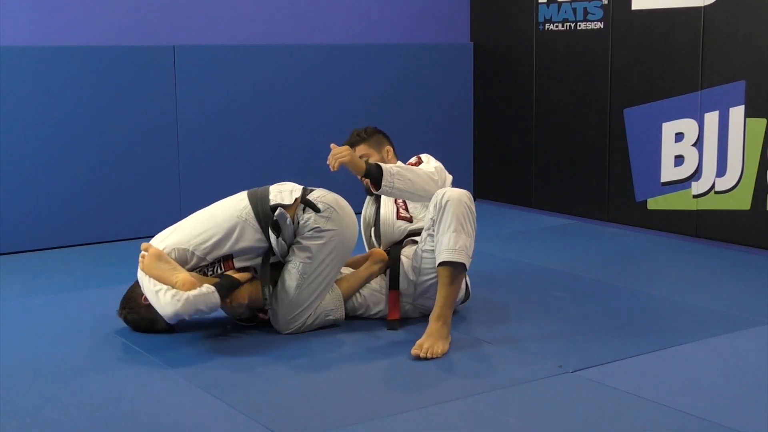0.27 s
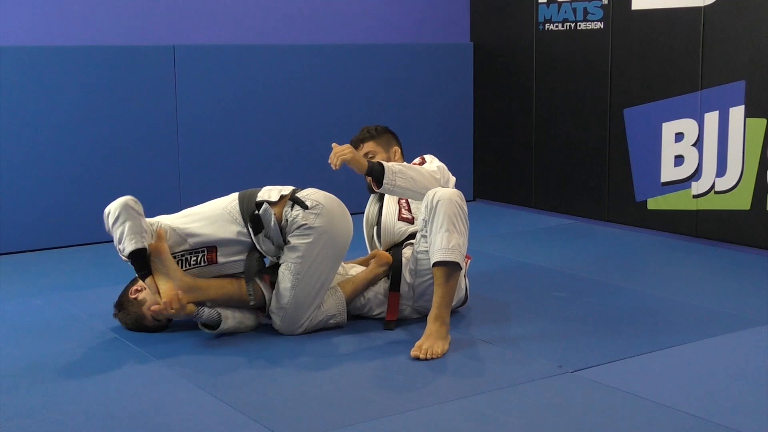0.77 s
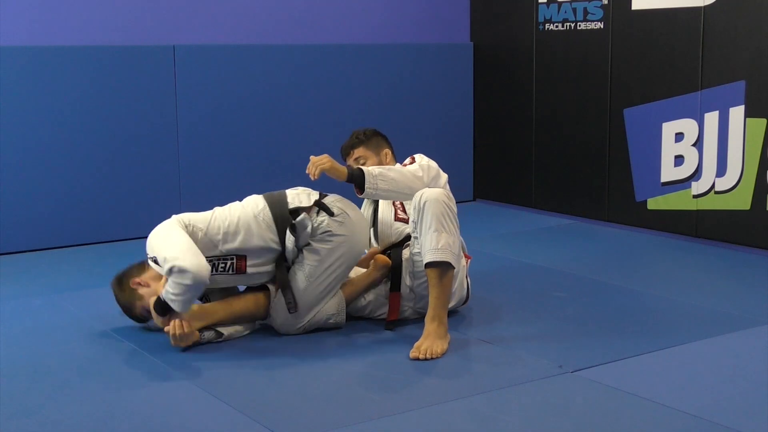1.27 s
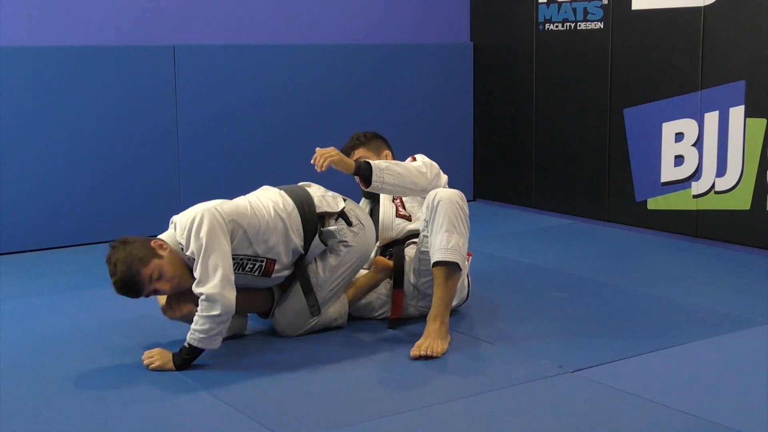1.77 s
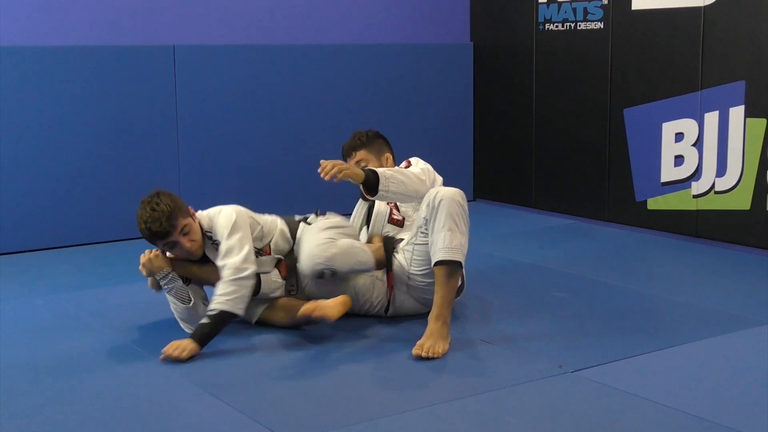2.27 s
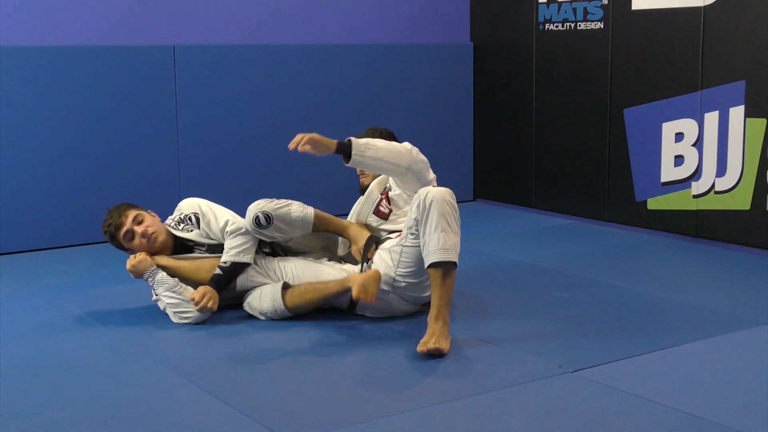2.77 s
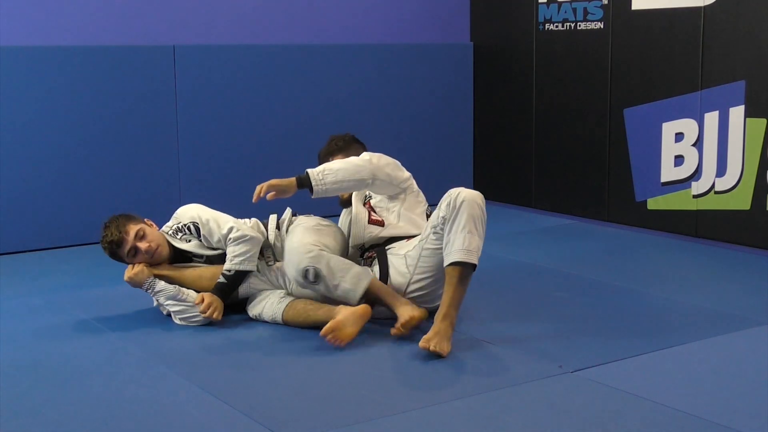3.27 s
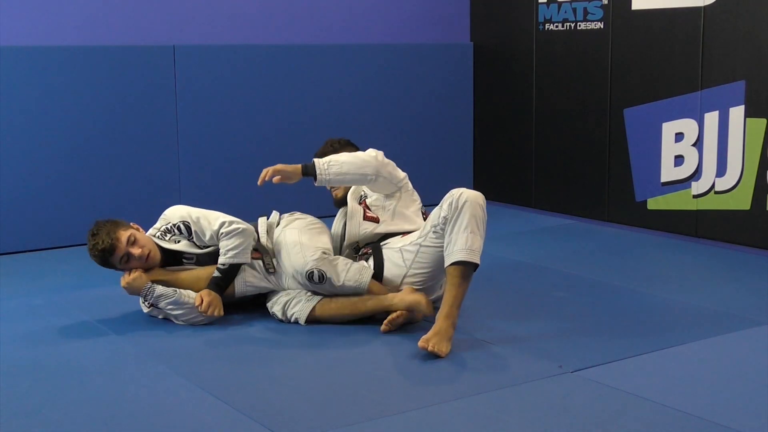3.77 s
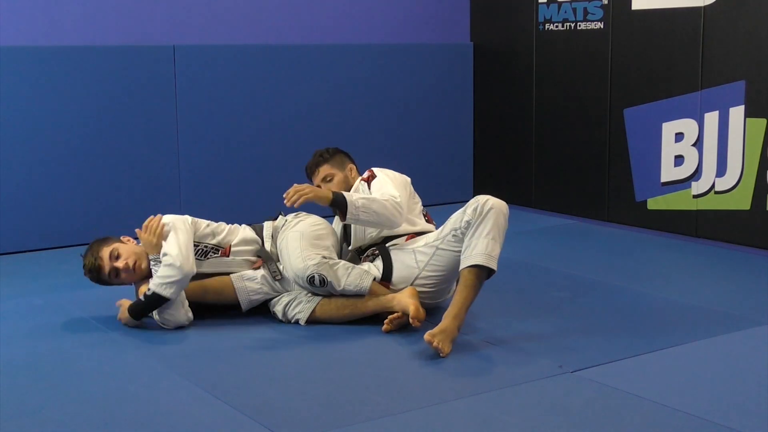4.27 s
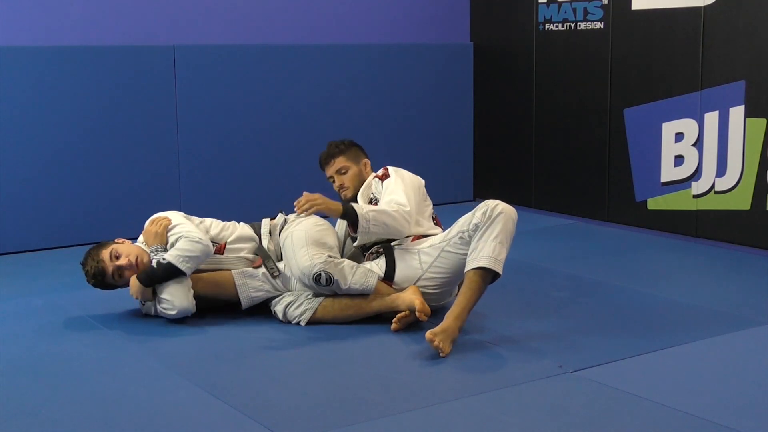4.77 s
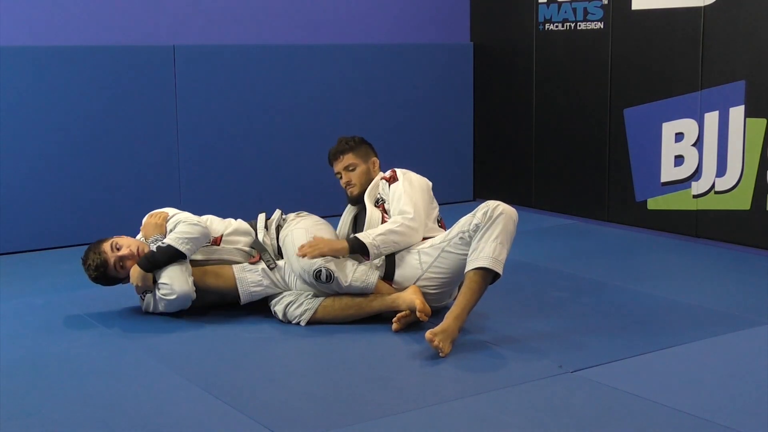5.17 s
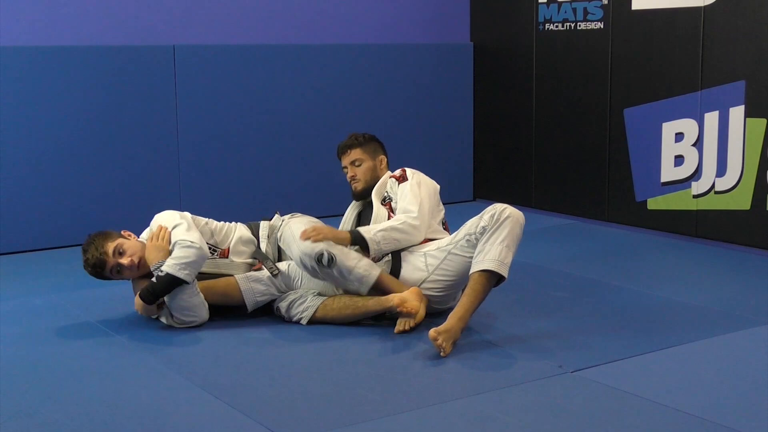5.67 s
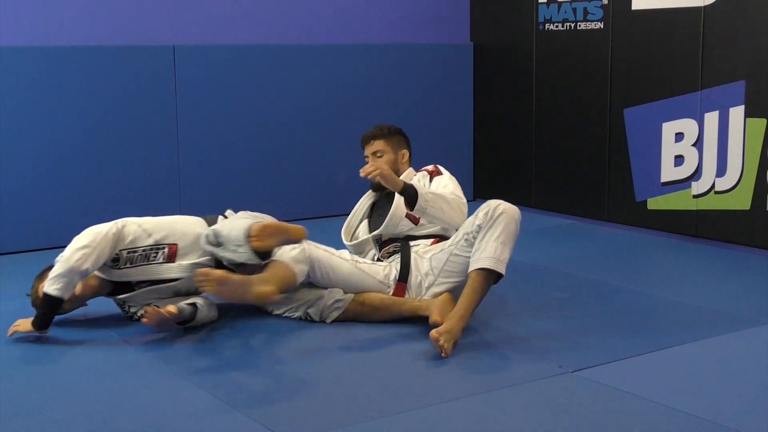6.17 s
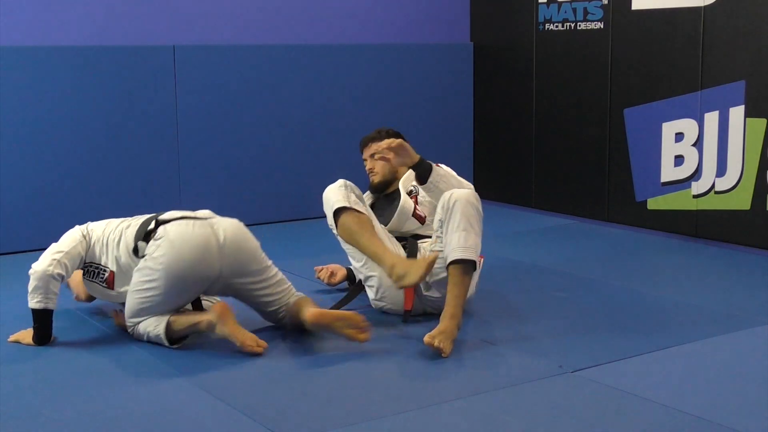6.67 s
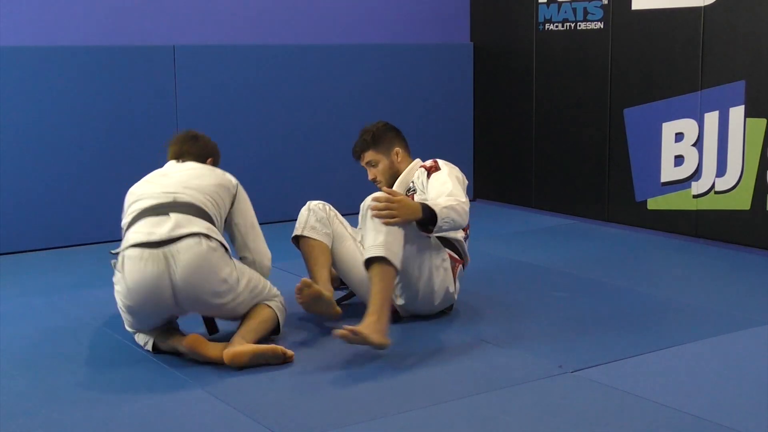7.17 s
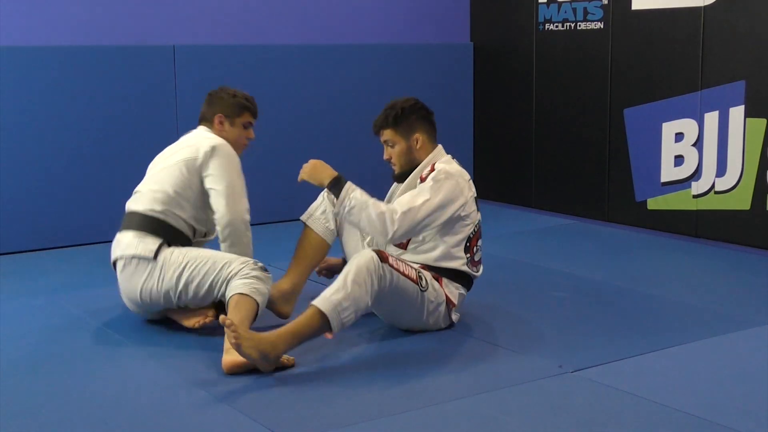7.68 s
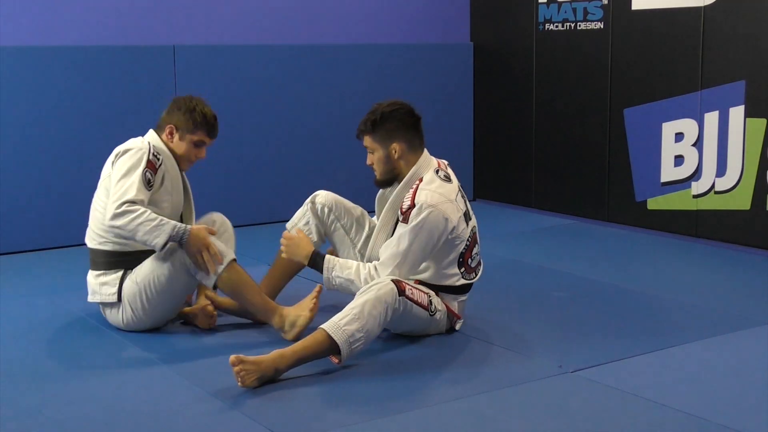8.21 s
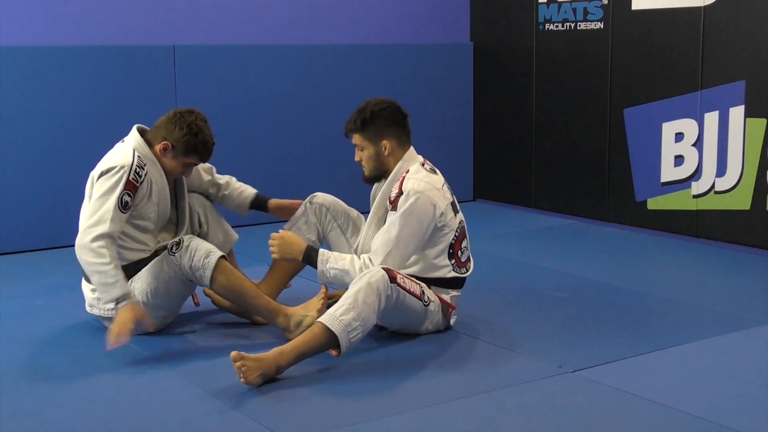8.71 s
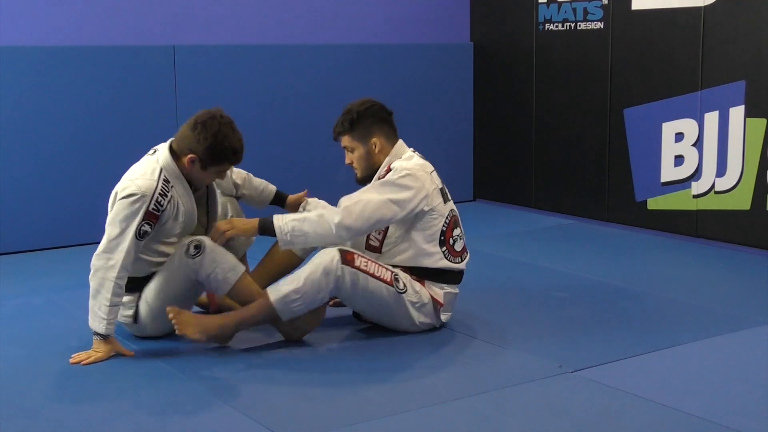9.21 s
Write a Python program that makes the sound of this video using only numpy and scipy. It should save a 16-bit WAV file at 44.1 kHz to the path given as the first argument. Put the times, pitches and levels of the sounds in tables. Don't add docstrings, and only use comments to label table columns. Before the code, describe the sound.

Thick cotton uniforms rustle and rasp as two people roll on foam mats, with dull floor thuds, a quick double slap and quiet resetting shuffles.

```python
import sys
import numpy as np
from scipy import signal
from scipy.fft import rfft, irfft
from scipy.io import wavfile
from scipy.ndimage import uniform_filter1d

SR = 44100
rng = np.random.default_rng(int(sys.argv[2]) if len(sys.argv) > 2 else 0)


def wrap_up_sound(samples):
    columns = np.atleast_2d(samples).T
    tamed = np.clip(columns, -1, 1)
    steps = np.round(tamed * 32767).astype(np.int16)
    wavfile.write(sys.argv[1], SR, steps)


def volts(x):
    e = np.asarray(x, float) / 20
    return 10 ** e


N = 416744


def on_log(hz, table):
    at_hz, value = np.transpose(table)
    return np.interp(np.log(np.maximum(hz, 1)), np.log(at_hz), value)


def colour(x, table):
    size = 8192
    gain = volts(on_log(np.fft.rfftfreq(size, 1 / SR), table))
    cepstrum = irfft(np.log(gain))
    cepstrum[1:size // 2] *= 2
    cepstrum[size // 2 + 1:] = 0
    impulse = irfft(np.exp(rfft(cepstrum)))[:min(size // 2, len(x))]
    return signal.oaconvolve(x, impulse)[:len(x)]


def unit(x):
    return x / np.sqrt(np.mean(x ** 2))


def walk(rate_hz):
    hold = max(int(SR / rate_hz), 1)
    steps = np.repeat(rng.standard_normal(N // hold + 1), hold)
    return 0.754 * uniform_filter1d(uniform_filter1d(steps, hold), hold)[:N]


def ring(t, hz, t60_s, push_s):
    return np.sin(2 * np.pi * hz * t) * 10 ** (-3 * t / t60_s) * (1 - np.exp(-t / push_s))


def add(track, start_s, sound):
    i = int(start_s * SR)
    track[i:i + len(sound)] += sound[:N - i]


def ventilation():
    # frequency [Hz], level [dB per Hz].
    air_spectrum = [(15, -33), (25, 0), (55, -7.5), (161, -1.5), (212, -0.5), (285, -7), (476, -10),
                    (591, -21), (796, -18.5), (1130, -7.5), (6050, -22), (10100, -22), (16000, -24.5)]
    # frequency [Hz], wander [Hz], level [dB rms].
    fan_tones = [(54.5, 4.5, -62), (121.7, 4.13, -64.5)]
    air = unit(colour(rng.standard_normal(N), air_spectrum)) * volts(-51 + .4 + .6 * walk(3))
    for hz, wander_hz, db in fan_tones:
        level = volts(db + 6.2 * walk(8.2))
        phase = 2 * np.pi * np.cumsum(hz + wander_hz * walk(5.9)) / SR
        air = air + level * unit(np.sin(phase))
    return air


def room(x):
    # frequency [Hz], T60 [s].
    room_decay = [(100, 0.57), (400, 0.49), (1500, 0.64), (5000, 0.5), (14000, 0.43)]
    t, tail = np.arange(SR) / SR, 0
    for hz in 61.0 * 2. ** np.arange(8):
        low_hz = hz / np.sqrt(2)
        high_hz = min(hz * np.sqrt(2) ** (1 + (hz > 7000)), .45 * SR)
        band = signal.butter(2, [low_hz, high_hz], "band", fs=SR, output="sos")
        decay = 10 ** (-3 * t / max(on_log(hz, room_decay), .05))
        tail = tail + signal.sosfilt(band, rng.standard_normal(SR)) * decay
    tail = tail * (1 - np.exp(-(t / 0.026) ** 4))
    return signal.fftconvolve(x, tail / np.sqrt(np.sum(tail ** 2)))[:N]


def thumps():
    # start [s], peak [dB], dent pitch [Hz], share of the slab modes [dB].
    landings = [(0.454, -34.5, 361, 5.5), (0.478, -35, 257, -2), (1.946, -39.5, 139, 7),
                (2.014, -32.5, 434, 0), (2.259, -17.5, 185, -1), (2.288, -12.5, 230, -5.5),
                (2.301, -20, 243.5, 2), (2.324, -21, 175, -5), (2.349, -22, 303, -1),
                (2.374, -23.5, 275, -6), (2.499, -36, 260, -3), (3.076, -32.5, 470, -16),
                (3.147, -27, 364.7, -4), (3.382, -35.5, 363, -1), (3.788, -32.5, 400, -10),
                (4.237, -39, 350, 3), (5.212, -29, 474, 0), (5.419, -32, 472, 2), (6.295, -34, 290, 0),
                (7.81, -32, 400, -2), (0.5, -34.5, 234, -3), (0.372, -42, 367, -6), (0.522, -40, 235, -9),
                (7.371, -42, 183, 1), (7.443, -41, 417, -4), (7.63, -39, 202, 0.5), (7.82, -37, 220, 0),
                (8.33, -40.5, 210.4, 2), (8.4, -44, 180, 0), (9.063, -42, 186, 3), (9.384, -40, 158.7, 2),
                (8.796, -44, 147, 0), (6.907, -40, 202, 0), (7.222, -36, 172, -6), (7.236, -24.5, 198, -8),
                (7.612, -38.5, 147.5, 0), (7.774, -31.5, 352, 4.5), (8.278, -40, 194, -1),
                (8.91, -42, 270.5, 1), (9.0, -41, 155, 0.5), (9.315, -40.5, 331, -2)]
    staged_contacts = [(1.6215, -29.5, 390, -6, 3.8), (1.64, -36, 510, -8, 4), (1.645, -30, 214, -15, 13),
                       (2.255, -21, 340, -4, 2.8), (2.27, -32.5, 55.88, -4, 4.6),
                       (6.5464, -12, 335, -7, 3.2), (6.573, -15, 210, -9, 7), (6.549, -18, 170, -8, 5.5),
                       (6.603, -22, 237, -6, 5.6), (2.232, -30, 350, -10, 3.2), (3.152, -33, 173, -8, 4.3),
                       (3.434, -39.5, 412, 2, 9.6), (3.47, -40, 388, -6, 6.6), (3.495, -35, 436, -6, 5.6),
                       (3.522, -44, 350, -7, 7), (3.556, -40, 190.4, -4, 4.4), (3.6, -42, 330, -2, 7),
                       (6.553, -32, 100, -5, 3.9), (8.681, -46, 115, -4, 8), (5.422, -36.5, 290, 2, 7.1),
                       (6.559, -24, 440, -12, 4), (6.571, -25, 470, -12, 5), (6.586, -26, 420, -12, 5),
                       (6.652, -27, 200, -10, 4), (2.269, -22, 370, -12, 4), (2.302, -22, 410, -14, 4.5),
                       (2.324, -28, 460, -14, 4.5), (2.456, -33, 370, -8, 9), (3.806, -40, 260, -8, 5),
                       (1.631, -31, 245, -12, 4.5), (6.618, -24, 190, -6, 5), (6.67, -32, 205, -10, 5),
                       (6.712, -31, 215, -8, 6), (2.312, -22, 205, -8, 6), (7.263, -31, 175, -6, 4)]
    # frequency [Hz], level [dB], T60 [s].
    slab_modes = [(57.3, -22, 0.27), (100.3, -9, 0.33), (151.4, -2, 0.28), (197.4, -2.5, 0.32),
                  (230.7, -1, 0.38), (308, -17, 0.12), (350, 1.5, 0.16), (397, -2.5, 0.12),
                  (450.4, -6, 0.18)]
    least_cycles, contact_s = 1.85, 0.011
    bony_hz, bony_ratio = 285, 0.58
    out, t = np.zeros(N), np.arange(SR // 2) / SR
    rows = [(*row, least_cycles + contact_s * row[2]) for row in landings] + [*staged_contacts]
    chances = rng.standard_normal((len(rows), 3, len(slab_modes)))
    for (start_s, db, hz, slab_db, cycles), chance in zip(rows, chances):
        press = np.sin(np.pi * np.minimum(t * hz / cycles, 1) ** 0.64) ** 1.4
        dent = np.sin(2 * np.pi * hz * t) * press
        slab = 0
        for (mode_hz, mode_db, t60_s), vary, detune, sign in zip(slab_modes, *chance):
            tone = ring(t, mode_hz * (1 + 0.0235 * detune), t60_s, 0.0092)
            slab = slab + volts(mode_db + 0.33 * vary) * np.sign(sign) * tone
        slab_hz = hz * (bony_ratio if hz > bony_hz else 1)
        local = volts(slab_db - 10.0) * ring(t, slab_hz, 0.22, 0.013)
        add(out, start_s + .0015, volts(db) * (dent + volts(slab_db - 8.0) * slab + local))
    return out


def slaps():
    # start [s], peak [dB], length [s], brightness [dB per octave].
    smack_events = [
        (0.347, -31.5, 0.0075, -1.5),
        (0.676, -35, 0.0045, -2.5),
        (1.623, -32, 0.0065, 0.5),
        (2.075, -23.5, 0.0082, 0.5),
        (2.259, -17.5, 0.0027, 3),
        (5.212, -15.5, 0.0074, -1.5),
        (5.412, -16.5, 0.0091, -0.5),
        (6.5456, -21, 0.0062, 5.5),
        (6.998, -35.5, 0.009, -8.5),
        (7.608, -30.5, 0.0053, 0.5),
    ]
    # frequency [Hz], level [dB per Hz].
    smack_spectrum = [(200, -4.5), (480, -12), (650, -5), (900, -9.5), (1300, -1.5), (2200, -2),
                      (4000, -5.5), (8000, -8), (15800, -16.5)]
    # frequency [Hz], level [dB], T60 [s].
    cup_modes = [(1327, -4.5, 0.018), (1730, 0, 0.012), (2220, -7, 0.011), (3290, -5, 0.013),
                 (4300, -8, .015), (4950, -12, .015), (6140, -13, 0.0091)]
    # lag [s], level [dB].
    wall_copies = [(.012, -5), (0.022, -4.5)]
    wall_dull_db = 1
    near, far, t = np.zeros(N), np.zeros(N), np.arange(SR // 10) / SR
    paths = [(0.0026, 0), *wall_copies]
    noises = rng.standard_normal((len(smack_events), len(paths), len(t)))
    for (start_s, db, length_s, bright_db), noise in zip(smack_events, noises):
        tone = [(hz, g + bright_db * np.log2(hz / 2000)) for hz, g in smack_spectrum]
        shape = np.exp(-(t / max(length_s, .001)) ** 3) * (1 - np.exp(-t / 0.0045))
        cup = 0
        for k, (hz, g, t60_s) in enumerate(cup_modes):
            cup = cup + volts(g + bright_db) * ring(t, hz * (1 + 0.031 * noise[0, k]), t60_s, 0.0011)
        for bounces, (lag_s, path_db) in enumerate(paths):
            heard = [(hz, g - wall_dull_db * bounces * max(np.log2(hz / 3000), 0)) for hz, g in tone]
            crackle = unit(colour(noise[bounces] * shape, heard)) * 0.075
            add(near, start_s + lag_s, volts(db + path_db) * (crackle + volts(-3.5) * cup))
        click = unit(colour(1. * (t == 0), tone))
        add(far, start_s, volts(db) * unit(click + volts(-17) * unit(cup)) * 0.065)
    return near, far


def grains(spread_db, channels):
    size = np.minimum(rng.exponential(size=N), 5)
    return rng.standard_normal((channels, N)) * volts(spread_db * size)


def fibres(table, spread_db, flicker_db, rate_hz):
    patches = volts(flicker_db * walk(rate_hz))
    return unit(colour(grains(spread_db, channels=1)[0] * patches, table))


def glide(grit, hz, width_hz):
    low = signal.butter(2, width_hz / 2, fs=SR, output="sos")
    real, imaginary = signal.sosfilt(low, grit)
    phase = 2 * np.pi * np.cumsum(hz) / SR
    return real * np.cos(phase) + imaginary * np.sin(phase)


def rasp(hz, width_hz, spread_db):
    return unit(glide(grains(spread_db, channels=2), hz, width_hz))


def strokes():
    # middle [s], length [s],
    # rib rate at start [Hz], at end [Hz], level [dB].
    cloth_strokes = [(0.684, 0.025, 1900, 1896, -43), (1.822, 0.036, 2100, 2087, -52),
                     (1.945, .03, 1705, 2175, -44), (2.074, 0.013, 2500, 4020, -40.5),
                     (2.091, 0.014, 2600, 2900, -37), (2.088, 0.015, 4160, 4720, -33.5),
                     (2.111, 0.018, 5200, 4830, -40), (2.261, .005, 2990, 3040, -33),
                     (2.267, .005, 4200, 4250, -36), (2.258, 0.0055, 5200, 5200, -35),
                     (2.28, 0.0079, 2300, 2315, -48), (2.38, 0.027, 1400, 1600, -37),
                     (2.959, 0.042, 1350, 1360, -51), (3.103, 0.042, 1605, 1600, -49),
                     (3.558, .008, 1250, 1198, -43), (4.27, .025, 2300, 3330, -47),
                     (5.45, .008, 1400, 1405, -38), (5.465, 0.0071, 1400, 1450, -36.5),
                     (5.76, 0.034, 1402, 1500, -46), (5.8, .02, 4200, 4290, -43.5),
                     (5.813, 0.019, 2190, 2600, -40), (5.829, .008, 3000, 3200, -42),
                     (5.839, .01, 2405, 2497, -41), (5.854, .014, 3500, 3200, -43),
                     (6.12, .03, 1147, 1139, -51), (6.209, 0.025, 2076, 2053, -42),
                     (6.248, 0.025, 1610, 1610, -46), (6.59, 0.032, 3160, 3070, -46),
                     (6.6, 0.032, 4750, 4520, -46), (6.612, 0.029, 1300, 1504, -47),
                     (6.857, 0.027, 1400, 1514, -42), (6.994, .01, 1300, 1250, -40),
                     (7.051, 0.032, 1997, 2107, -46.5), (7.8, .04, 1401, 1456, -42),
                     (7.865, 0.037, 2606, 2400, -51), (8.47, .04, 2390, 2800, -48),
                     (9.286, 0.04, 2505, 2494, -44.5), (9.397, 0.038, 1530, 1547, -40.5),
                     (0.47, .015, 2430, 2510, -47), (0.68, .012, 3310, 2970, -48),
                    (0.699, 0.013, 1450, 1400, -44), (0.74, .025, 2200, 1550, -46),
                    (0.69, .02, 4200, 4100, -49), (0.675, .012, 2500, 2500, -46),
                    (0.7, .03, 3000, 2700, -47), (1.693, 0.027, 1300, 1300, -49),
                    (5.21, .004, 2510, 2400, -45), (5.2166, 0.0017, 2400, 2200, -26.5),
                    (5.22, .002, 1700, 1690, -32), (5.2205, 0.0018, 3300, 3270, -31),
                    (5.232, .004, 3380, 3380, -34), (5.24, .005, 2100, 2380, -36),
                    (5.268, .004, 2620, 2600, -37), (5.4209, .004, 1900, 2100, -30),
                    (5.422, .003, 4400, 4400, -35), (5.431, .006, 2900, 3400, -38),
                    (5.4205, .004, 5700, 5600, -36), (5.4175, .002, 2100, 1900, -32),
                    (5.2185, .003, 4700, 4700, -39), (6.551, .003, 1803, 1820, -34),
                    (6.2, .02, 3000, 3030, -47), (6.208, .006, 2200, 2000, -40),
                    (6.24, .008, 1600, 1600, -42), (5.828, .012, 2050, 2050, -41),
                    (6.18, .02, 1500, 1500, -46), (7.72, 0.047, 3196, 3196, -45.5),
                    (8.36, 0.0057, 1498, 1490, -47.5), (8.43, .012, 2000, 1998, -45),
                    (8.633, 0.023, 2200, 2100, -48.5), (8.813, .015, 1403, 1390, -48),
                    (9.085, .015, 1500, 1603, -48)]
    out, t = np.zeros(N), np.arange(-.15, .15, 1 / SR)
    grit = grains(spread_db=6.5, channels=2)
    for middle_s, length_s, from_hz, to_hz, db in cloth_strokes:
        hz = from_hz + (to_hz - from_hz) * np.clip(.5 + t / (2 * length_s), 0, 1)
        start = int(min(middle_s * SR, N - len(t)))
        swell = np.exp(-(t / length_s) ** 2)
        ribs = swell * glide(grit[:, start:start + len(t)], hz, .22 * from_hz)
        add(out, middle_s + t[0], volts(db) * np.sqrt(np.mean(swell ** 2)) * unit(ribs))
    return out


def moves(t, rows, rest_db, extra_rest_db):
    # time [s], restless drag [dB].
    effort_curve = [(0, -50), (.6, -49), (1.0, -55), (1.55, -57), (1.9, -52), (2.3, -42), (2.75, -49.5),
                    (3.3, -48), (3.7, -52.5), (4.25, -52), (4.55, -65.5), (5.08, -71), (5.6, -55),
                    (6.0, -47.5), (7.5, -46.5), (8.19, -55), (9.15, -49), (9.45, -42.5)]
    peak_s, length_s, db, extra_db = np.transpose(rows)[:, :, None]
    share = np.where(t < peak_s, 0.93, 1.15)
    gone = np.abs(t - peak_s) / (np.maximum(length_s, .005) * share)
    power = volts(db) ** 2 * np.exp(-2 * gone ** 1.4)
    rest = volts(np.interp(t, *np.transpose(effort_curve))) ** 2
    first = power.sum(0) + rest * volts(rest_db) ** 2
    second = (power * volts(extra_db) ** 2).sum(0) + rest * volts(extra_rest_db) ** 2
    return 10 * np.log10([first, second])


def cloth():
    # peak [s], length [s], drag [dB], foam over drag [dB].
    body_shifts = [(0.0, .04, -44.5, 8), (0.447, .06, -44, 3.5), (0.638, .06, -48, 5),
                   (0.911, .05, -53.5, 7), (1.093, .025, -52, 8.5), (1.257, .06, -48, 4),
                   (1.677, .03, -46.5, 4), (1.807, .04, -47.5, -1), (1.939, .03, -40, -2.5),
                   (2.063, .05, -35.5, -4.5), (2.15, .04, -39, -3), (2.288, .04, -31, 5.5),
                   (2.383, .03, -34, 0), (2.47, .06, -40.5, 8), (2.55, 0.043, -41.5, 3),
                   (2.62, 0.055, -43, 5), (2.951, .06, -44, -14), (3.11, .07, -43.5, 2.5),
                   (3.244, .07, -47.5, -12), (3.42, .05, -44, 5.5), (3.555, .06, -41.5, 4),
                   (3.824, .06, -52, 1), (4.225, .08, -48.5, 2), (4.762, .04, -56.5, -7),
                   (5.18, 0.077, -55, 3), (5.81, .05, -44, -3), (5.94, .05, -49, 7.5),
                    (6.13, 0.065, -41, -1), (6.46, 0.033, -47.5, -1), (6.585, .03, -41.5, -10),
                    (6.67, .05, -48, 8.5), (6.84, 0.093, -41.5, 5.5), (7.0, 0.067, -42.5, -15),
                    (7.28, 0.062, -46, 3), (7.47, 0.075, -46, 1.5), (7.65, 0.053, -39, 0.5),
                    (7.74, 0.06, -36.5, -10), (7.84, 0.073, -34.5, -1.5), (8.03, .07, -45.5, 0.5),
                    (8.299, 0.058, -46.5, -1.5), (8.44, 0.069, -44.5, -4.5), (8.59, 0.026, -49.5, -12.5),
                    (8.9, 0.11, -49.5, -6.5), (9.1, 0.063, -47.5, -5.5), (9.32, 0.071, -42.5, -5.5),
                    (9.45, 0.063, -42.5, 2)]
    # peak [s], length [s], swish [dB], scuff over swish [dB].
    limb_slides = [(0.0, .06, -40, -2), (0.366, .04, -47.5, -5), (0.478, 0.057, -42, -5),
                   (0.69, .045, -44, 5.5), (0.912, 0.057, -54, 2), (1.085, .03, -55, 2),
                   (1.254, 0.077, -56.5, 2.5), (1.502, 0.084, -49, -1.5), (1.66, 0.044, -44, -3),
                   (1.827, .04, -48.5, -2), (1.981, 0.051, -35, -0.5), (2.08, .03, -33.5, 4),
                   (2.13, 0.033, -34, -4.5), (2.177, 0.0253, -23, -19), (2.199, .015, -24.5, -17.5),
                   (2.217, 0.0081, -26, -16), (2.29, .05, -29, -7), (2.421, 0.13, -37.5, -3),
                   (2.617, 0.074, -44, 1), (2.894, .1, -48.5, -2), (3.101, .1, -52, 2.5),
                   (3.25, .06, -47, -10), (3.407, 0.071, -40.5, -0.5), (3.527, 0.071, -38.5, -3),
                   (3.815, .08, -52, -0.5), (4.198, 0.073, -49, 0), (4.289, 0.041, -34, -12),
                   (4.341, 0.037, -37.5, -11.5), (4.757, 0.044, -54, -2),
                   (5.77, 0.063, -42, 0.5), (5.831, 0.03, -44.5, 11), (5.94, 0.06, -46, -4),
                    (6.11, 0.045, -36.5, -7), (6.17, 0.038, -39, -5), (6.23, 0.045, -46.5, 2.5),
                    (6.44, 0.085, -46.5, -3), (6.635, 0.07, -38.5, -5.5), (6.84, 0.077, -44, -2.5),
                    (7.01, 0.05, -38, -8), (7.28, 0.071, -46, 1), (7.47, 0.12, -42, -8),
                    (7.651, 0.038, -31, -6), (7.75, 0.063, -41.5, 4.5), (7.84, 0.084, -36.5, -0.5),
                    (7.97, 0.1, -41, 0.5), (8.09, 0.033, -44, -1), (8.3, .06, -44.5, -2.5),
                    (8.4, 0.068, -44, -6), (8.49, 0.069, -40, -1.5), (8.64, 0.03, -50, 0.5),
                    (8.931, 0.063, -47.5, 1), (9.08, 0.13, -44.5, -2), (9.33, 0.074, -42.5, 4.5),
                    (9.39, 0.048, -43, 4), (9.45, 0.061, -47, 11.5)]
    # frequency [Hz], level [dB per Hz].
    drag_spectrum = [(120, -8.5), (400, -17), (600, -7), (850, -9.5), (1150, -1.5), (1600, -1.5),
                     (2200, -6.5), (3200, -10), (9000, -29.5), (15500, -39)]
    scuff_spectrum = [(700, -19.5), (1500, -20), (2200, -0.5), (3000, 0.5), (4200, -5), (6000, -13.5),
                      (15500, -20)]
    swish_spectrum = [(800, -36), (2500, -12), (4000, 1.5), (5000, -0.5), (7000, -0.5), (10500, 1.5),
                      (13000, -3.5), (15800, -8.5)]
    foam_spectrum = [(20, -37), (40, -20), (55, -15), (90, -17), (150, -7), (230, -6.5), (400, -4),
                     (500, -8), (600, -36), (900, -40)]
    coarse_s = np.arange(0, N / SR + .01, .002)
    shift_levels = moves(coarse_s, body_shifts, rest_db=0, extra_rest_db=-1.5)
    slide_levels = moves(coarse_s, limb_slides, rest_db=-1.5, extra_rest_db=-3.5)
    levels = [np.interp(np.arange(N) / SR, coarse_s, c) for c in [*shift_levels, *slide_levels]]
    drag_db, foam_db, swish_db, scuff_db = levels
    rib_hz = np.clip(1995 + 50 * (scuff_db - drag_db), 1400, 2700)
    drag = fibres(drag_spectrum, spread_db=2.5, flicker_db=2.0, rate_hz=45) * volts(drag_db - 0.26)
    scuff = fibres(scuff_spectrum, spread_db=1.0, flicker_db=2.5, rate_hz=33) * volts(scuff_db - 3.0)
    swish = fibres(swish_spectrum, spread_db=2.0, flicker_db=0.7, rate_hz=40) * volts(swish_db - 0.35)
    ribs = rasp(rib_hz, width_hz=1030, spread_db=4.0) * volts(np.maximum(drag_db, scuff_db) - 10.5)
    foam = fibres(foam_spectrum, spread_db=1.5, flicker_db=.9, rate_hz=30) * volts(foam_db - 4.5)
    return drag + scuff + swish + ribs + strokes() + foam


def scene():
    # frequency [Hz], left-right correlation [0-1].
    likeness = [(30, .68), (150, .82), (300, .93), (700, .83), (1400, .84), (2500, .77), (5000, .82),
                (8000, .965), (12000, .82), (15500, .84)]
    # frequency [Hz], left minus right [dB].
    balance = [(60, 1.8), (200, 1.1), (700, -.6), (1800, -1.1), (8000, .1), (15000, .6)]
    port_lag_s = 0.00047
    moving, blows, (smacks, clicks) = cloth(), thumps(), slaps()
    walls = volts(-8) * moving + volts(-12.5) * blows + volts(1) * clicks
    mid = moving + blows + smacks + room(walls) + ventilation()
    floor_lead = port_lag_s * SR * np.gradient(blows)
    other = cloth() + room(walls) + volts(-6) * smacks + floor_lead + ventilation()
    side = colour(other, [(hz, 10 * np.log10((1 - min(c, .99)) / (1 + c))) for hz, c in likeness])
    left = colour(mid + side, [(hz, db / 2) for hz, db in balance])
    right = colour(mid - side, [(hz, -db / 2) for hz, db in balance])
    return np.array([left, right])


def band_limit(x):
    return signal.sosfilt(signal.butter(12, 17010, fs=SR, output="sos"), x)


def record(dry):
    bass_cut = signal.butter(3, 42, "high", fs=SR, output="sos")
    top_cut = signal.ellip(12, .2, 80, 15720, fs=SR, output="sos")
    mix = signal.sosfilt(top_cut, signal.sosfilt(bass_cut, dry))
    return band_limit(mix)


dry = scene()
out = record(dry)
wrap_up_sound(out)
```